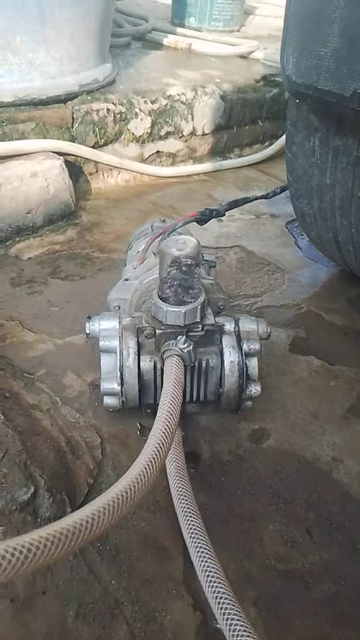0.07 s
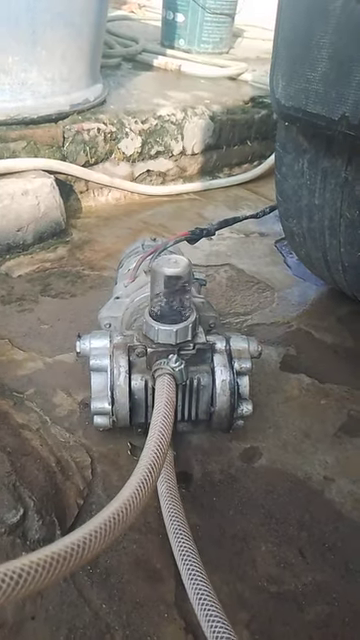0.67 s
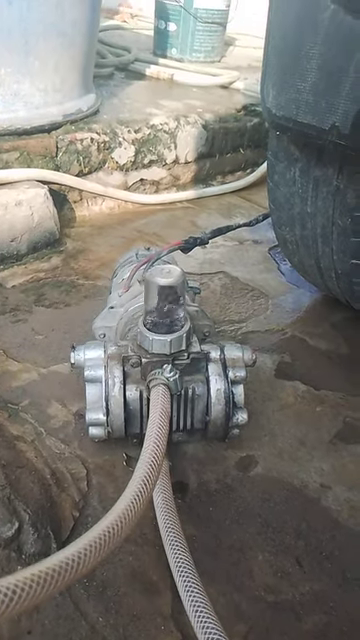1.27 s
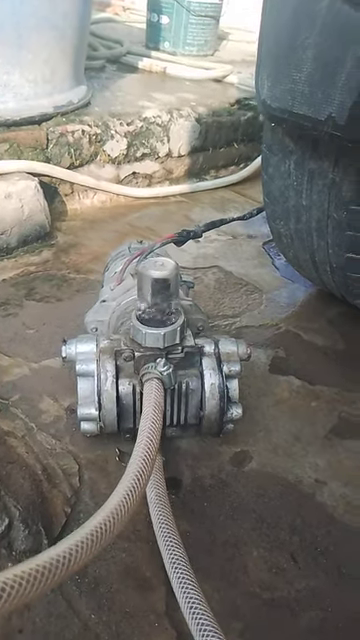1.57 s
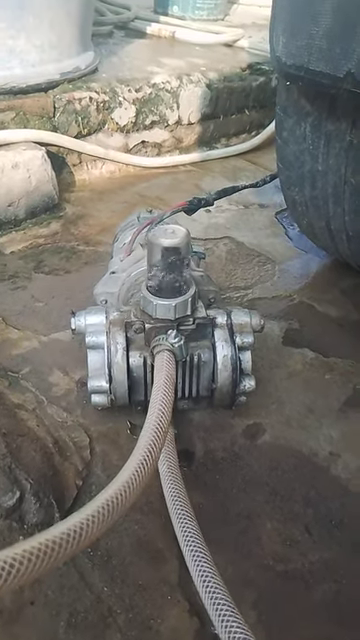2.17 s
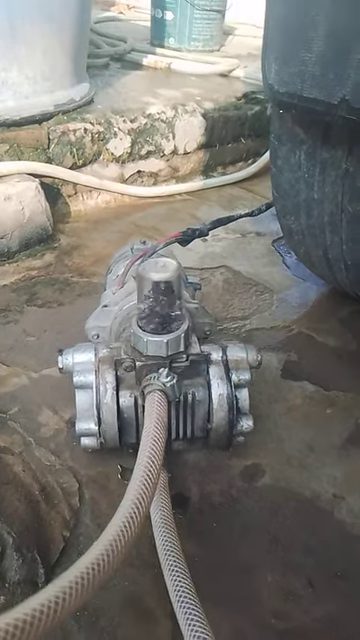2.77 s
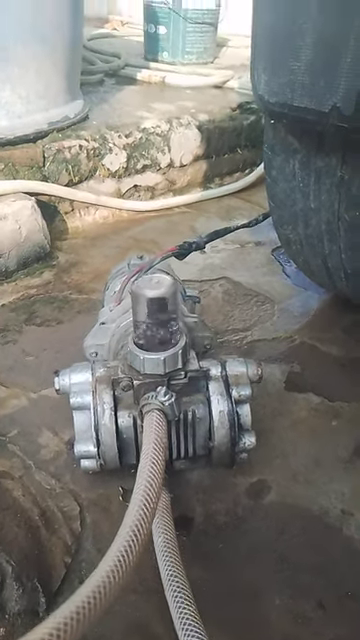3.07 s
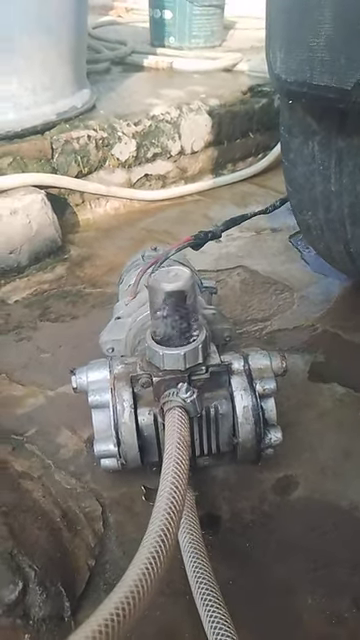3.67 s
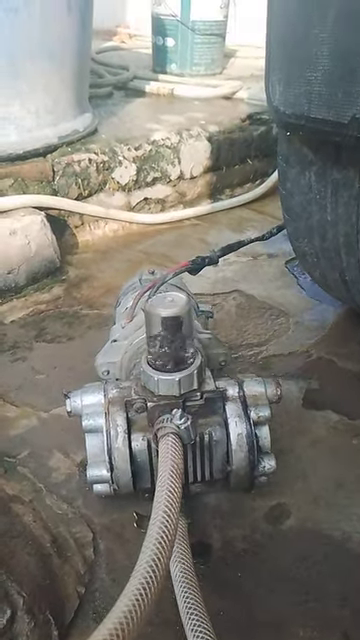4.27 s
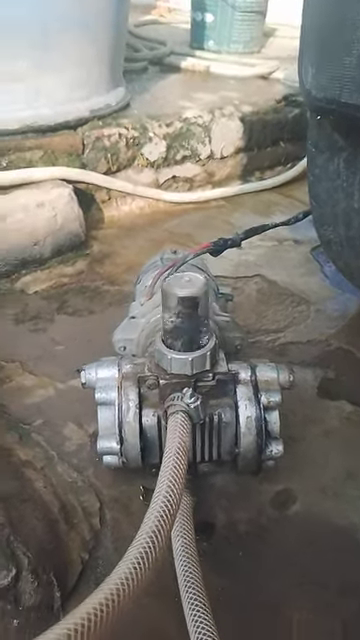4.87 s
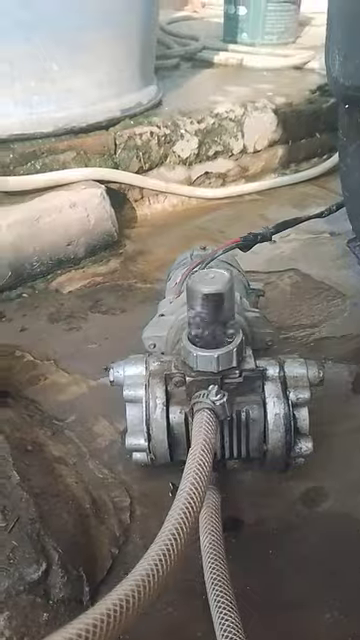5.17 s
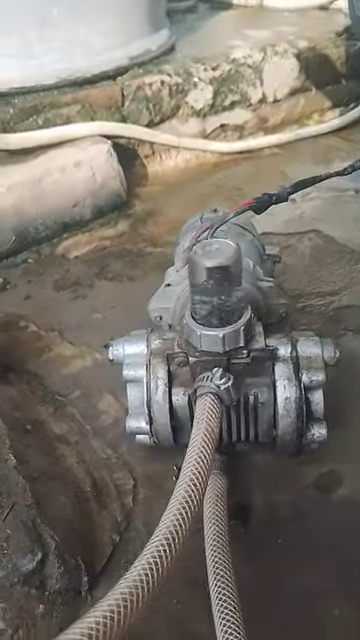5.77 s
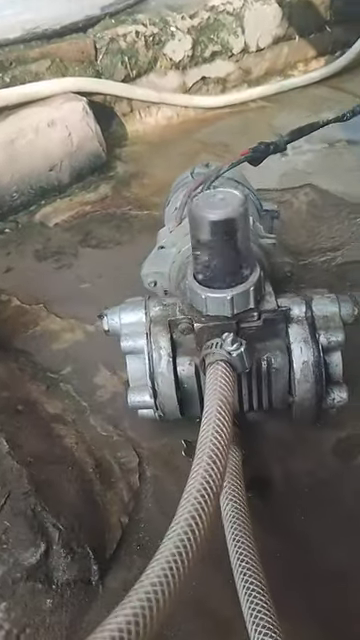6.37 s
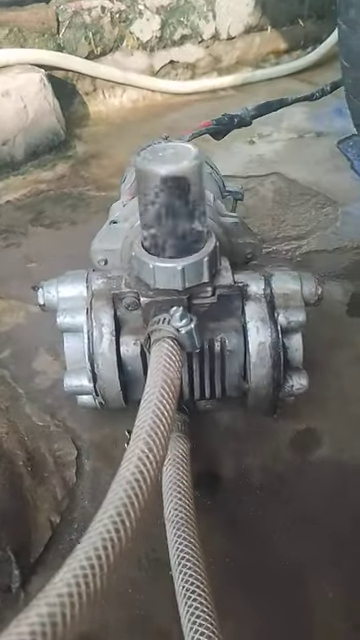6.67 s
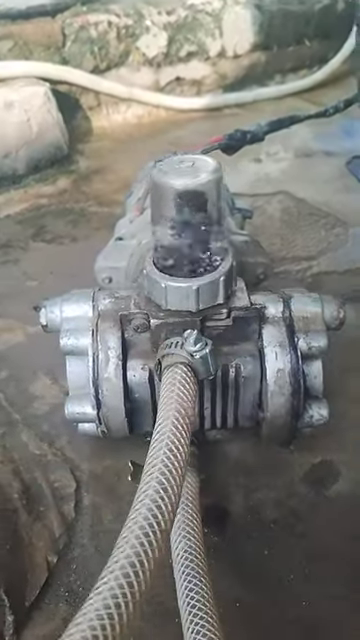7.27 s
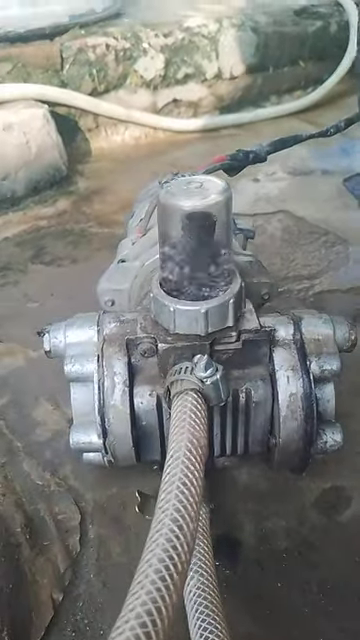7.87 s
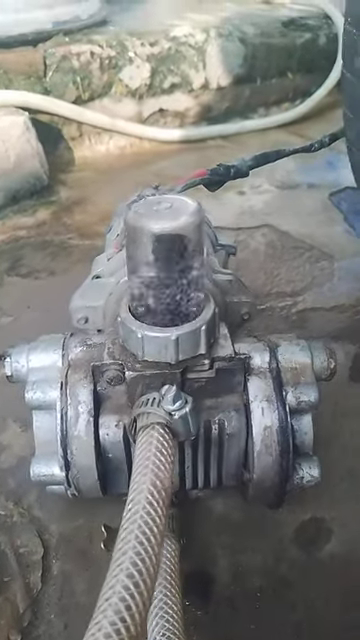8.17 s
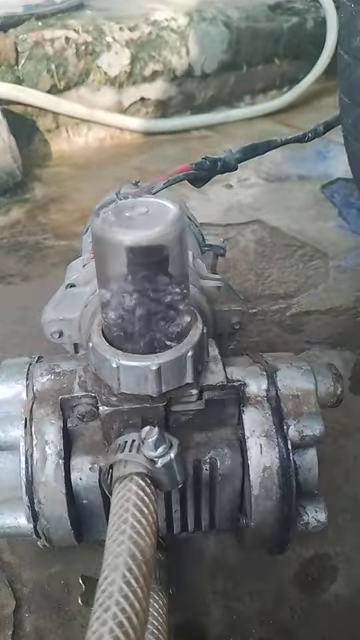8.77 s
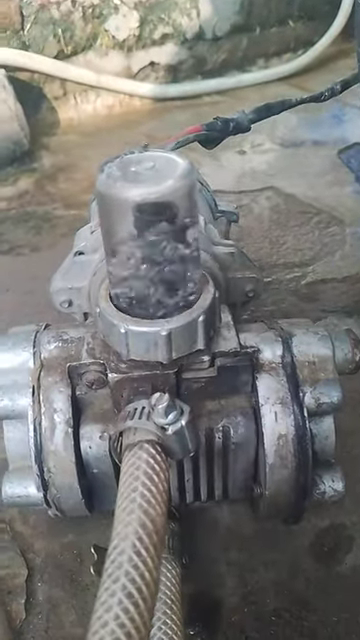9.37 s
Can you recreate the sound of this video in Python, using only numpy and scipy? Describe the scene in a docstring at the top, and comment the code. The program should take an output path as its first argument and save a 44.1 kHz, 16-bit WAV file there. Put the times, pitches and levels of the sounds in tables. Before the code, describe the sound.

After a moment of silence, a small electric piston pump cuts in, already running outdoors. It knocks rapidly and evenly over a low motor drone, spitting air and water through its valves while the metal casing rattles and a loose part chatters in short ringing bursts. The sound softens briefly, then swells as the microphone moves in, ending close with the chatter at its loudest.

```python
"""After a moment of silence, a small electric piston pump is heard running on wet concrete outdoors.
From the first turn, its crank thumps the hoses, knocks dully and spits air and water through the valves;
between spits the metal casing rattles and a loose part chatters in short ringing bursts.
The pump softens briefly near 2 s, then swells as the microphone moves in, facing the valve cap near 6 s.
By the end the pump head is close, and the part, worked looser, chatters at its loudest."""
import sys
import numpy as np
from scipy import signal
from scipy.fft import rfft, irfft
from scipy.io import wavfile

SR = 44100
rng = np.random.default_rng(int(sys.argv[2]) if len(sys.argv) > 2 else 0)


def int16_out(signal):
    """Quantize to a 16-bit WAV file."""
    q = np.round(np.clip(np.atleast_2d(signal).T, -1, 1) * 32767)
    wavfile.write(sys.argv[1], SR, q.astype(np.int16))


N = 419832
TIME = np.arange(N) / SR

# outdoor air bed: freq_hz, gain_db
AIR_COLOUR = [(20, -20), (45, -9), (110, 4), (170, -7.5), (400, 0), (2000, -16.5), (15000, -26.5)]
# how far the crank runs ahead of its steady pace: time_s, lead_turns
CRANK_LEAD = [(.9, -.07), (1.6, -.06), (2.05, -.125), (3.25, -.045), (3.6, -.06), (4.5, .03), (5.35, .01),
              (6.07, .095), (6.7, .04), (7.6, .06), (8.75, -.01), (9.5, -.14)]
# pressure pulse in the hoses: crank_multiple, level_db
THUMP_PARTIALS = [(3, -42), (4, 0.5), (5, -8.5), (6, -22), (7, -13), (8, -15)]
# motor drone: crank_multiple, level_db
DRONE_PARTIALS = [(4, -9.5), (6, -29), (10, -19), (13, -5.5), (16, -7), (18, -1), (23, -3)]
# knocks within one turn: place_turns, level_db, pitch_hz, ring_s
TURN_KNOCKS = [(.08, -4, 430, .022), (.19, 2.5, 285, .05), (.53, -2.5, 312, .045), (.74, -14.5, 236, 0.031),
               (0.909, -3.5, 370, 0.034)]
# envelope of the spit over one turn: place_turns, level_db
SPIT_ENVELOPE = [(0, 3.5), (.1, -1.5), (.18, -7.5), (.3, -20.5), (.45, -34), (.65, -48), (.77, -23),
                 (.8, -5), (.9, -1)]
# broad tone of the valves: freq_hz, gain_db
VALVE_TONE = [(200, -16), (420, 4), (800, -2), (1800, 1), (3000, 2.5), (3700, 0.5), (5200, 1), (6400, -2.5),
              (7400, -11.5), (10000, -11), (13000, -13.5), (14500, -9.5), (15600, -8)]
# valve resonances: pitch_hz, width_hz, boost_db
VALVE_PEAKS = [(1932, 120, 11), (2490, 160, 6), (3370, 86, 5), (3632, 200, 9.5), (3876, 110, 12),
               (4060, 110, 8), (4278, 77, 6), (4715, 260, 8), (5116, 48, 4), (5415, 104, 6), (5566, 64, 4),
               (6020, 363, 9.5), (6838, 389, 4.5), (7800, 480, 10), (8298, 125, 5.6), (9084, 411, 10),
               (9957, 219, 9), (10660, 268, 9.5), (15513, 382, 7)]
# air bubbles ringing in the valve cap: pitch_hz, width_hz, level_db
CAP_BUBBLES = [(3905, 18, -24), (4765, 28, -17), (6100, 140, -24.5)]
# treble colour beamed by the valve cap: freq_hz, gain_db
CAP_BEAM = [(3000, 0.5), (4000, 1), (5000, -3.5), (5700, 3.5), (6600, 2.5), (7800, 1.5), (9500, -1),
            (15000, -0.5)]
# how squarely the microphone faces the cap: time_s, facing_fraction
CAP_FACING = [(.9, 0.16), (2.5, 0.04), (4.3, 0.18), (5.2, 0.77), (6.2, 1), (6.8, 0.34), (8, 0.15),
              (9.5, 0.15)]
# envelope of the rattle over one turn: place_turns, level_db
RATTLE_ENVELOPE = [(.02, -9.5), (.12, -15.5), (.21, -15.5), (.28, -11), (.38, -11), (.55, -16), (.7, -13.5),
                   (.84, -11.5), (.94, -19.5)]
# broad tone of the metal casing: freq_hz, gain_db
CASING_TONE = [(120, -45), (170, -44), (215, 1.5), (320, 6), (520, -5), (750, 2), (1000, 1), (1400, 0.03),
               (2300, 4.5), (3100, -3.5), (4200, -7), (6200, -11.5), (7400, -22.5), (10000, -32.5),
               (13000, -40), (15600, -35)]
# casing resonances: pitch_hz, width_hz, boost_db
CASING_PEAKS = [(880, 36, 9.8), (965, 48, 4.2), (1141, 215, 12.5), (1572, 184, 18.3), (1936, 44, 11.8),
                (2070, 210, 5.6), (2500, 43, 2.3), (2710, 97, 7), (3500, 410, 5.6), (6300, 370, 3.4)]
# the crank throws the loose part at the casing: place_turns, length_turns, level_db
PART_THROWS = [(.03, 0.11, -2.5), (.32, 0.21, 0), (.52, 0.12, -1), (.73, .07, -22)]
# its hardest clangs, relative to an ordinary throw: start_s, length_s, level_db
PART_CLANGS = [(1.753, 0.015, 5.5), (2.57, 0.004, 6), (2.623, .008, 11), (2.886, 0.028, 6),
               (3.056, 0.0071, 10), (3.392, 0.0074, 6.5), (3.922, 0.023, 4), (4.251, 0.018, 4.5),
               (4.404, .013, 7), (4.47, .011, 7), (5.111, 0.018, 6), (5.163, 0.013, 7), (5.555, 0.0074, 8),
               (5.607, .013, 6), (6.031, .02, 4.5), (6.242, 0.025, 5.5), (6.282, 0.026, 2.5),
               (6.524, 0.015, 7.5), (7.389, 0.0055, 10), (8.157, 0.013, 6.5), (8.636, 0.019, 5.5),
               (8.686, .022, 4), (8.745, 0.0065, 5.5), (8.802, 0.0077, 5), (9.08, .012, 5.5),
               (9.125, .012, 5), (9.235, 0.0074, 6.5)]
# an ordinary throw grows louder as the part works loose: time_s, level_db
PART_LOOSENESS = [(.9, -24.5), (2.5, -22), (3.4, -20), (4.4, -19.5), (4.9, -21), (6.3, -19), (6.7, -21.5),
                  (8, -20), (8.25, -15.5), (9.5, -15.5)]
# how far off the pump sounds as the microphone moves in, with brief dips in level: time_s, distance_m
APPARENT_DISTANCE = [(.9, 0.72), (2.2, 0.96), (3.1, 0.57), (6.2, 0.6), (6.8, 0.33), (7.9, 0.41),
                     (8.5, 0.37), (9.5, 0.28)]
# extra radiation heard close up: freq_hz, gain_db
CLOSE_COLOUR = [(300, 0), (550, 3.5), (880, -2), (1050, 0), (1170, 0), (1350, 5.5), (1580, -3.5),
                (1750, 3.5), (1935, -11), (2020, -7), (2200, -2.5), (2550, 1), (3000, -1), (3700, 1),
                (5000, -1), (15000, 0.5)]


def amp(db):
    """Decibels to gain."""
    return 10 ** (np.asarray(db) / 20)


def unit_rms(x):
    """Scales to rms 1."""
    return x / np.sqrt(np.mean(x ** 2) + 1e-20)


def curve(points):
    """Automation line through (time_s, value) points."""
    return np.interp(TIME, *np.transpose(points))


def drift(hz):
    """Smooth random wander of rms 1, rolling off above hz."""
    f = np.fft.rfftfreq(N, 1 / SR)
    return unit_rms(irfft(rfft(rng.standard_normal(N)) * np.exp(-(f / hz) ** 2), N))


def body(x, colour, modes=(), size=4096):
    """Rings x through a minimum-phase EQ: a broad colour with resonances on it."""
    hz = abs(np.fft.fftfreq(size, 1 / SR))
    f, db = np.transpose(colour)
    db = np.interp(np.log(hz + 1), np.log(f), db)
    for centre, width, height in modes:
        db = db + height / (1 + (2 * (hz - centre) / width) ** 2)
    spectrum = np.exp(np.conj(signal.hilbert(np.log(amp(db)))))
    return signal.oaconvolve(x, np.fft.ifft(spectrum).real)[:N]


def resonate(x, hz, width_hz):
    """A resonance of gain 1 that follows the curve hz."""
    carrier = np.exp(2j * np.pi * np.cumsum(hz) / SR)
    pole = np.exp(-np.pi * width_hz / SR)
    return 2 * (carrier * signal.lfilter([1 - pole], [1, -pole], x / carrier)).real


def each_turn(points, turns):
    """Gain envelope that loops with the crank."""
    place, db = np.transpose(points)
    return amp(np.interp(turns, place, db, period=1))


def grains(per_s, spread_db):
    """Random tiny impacts of uneven size."""
    size = amp(spread_db * np.clip(rng.standard_normal(N), -2, 2)) * rng.choice([-1, 1], N)
    return unit_rms(size * (rng.random(N) < per_s / SR))


def outdoor_air():
    """A steady bed of dark noise."""
    return unit_rms(body(rng.standard_normal(N), AIR_COLOUR))


def yard_reflections(x, wet_db=-15, t60=0.046):
    """Adds faint, short reflections from the ground, the kerb and the tanks."""
    t = np.arange(SR // 8) / SR
    taps = rng.choice([-1, 1], len(t)) * (rng.random(len(t)) < 2000 / SR)
    taps = taps * (t > .002) * amp(-60 * t / t60)
    return x + amp(wet_db) * signal.oaconvolve(x, taps / np.linalg.norm(taps))[:N]


def hose_and_motor_hum(turns, thump_turns=0.21):
    """One pressure pulse a turn thumps the hoses over the drone of the motor."""
    thump = sum(amp(db) * np.cos(2 * np.pi * k * (turns - thump_turns)) for k, db in THUMP_PARTIALS)
    drone = sum(amp(db + 2 * drift(12)) * np.sin(2 * np.pi * k * turns) for k, db in DRONE_PARTIALS)
    return np.sqrt(2) * (thump + drone)


def piston_knocks(turns, jitter_s=0.00052, spread_db=1.5):
    """Pistons and valves knock dully at set crank angles, never quite alike."""
    t, out = np.arange(SR // 10) / SR, np.zeros(N)
    count = np.arange(int(turns[-1]))
    for place, db, hz, t60 in TURN_KNOCKS:
        late, size = rng.standard_normal((len(count), 2)).T
        start_s = np.interp(count + place, turns, TIME) + jitter_s * late
        samples = np.clip(start_s * SR, 0, N).astype(int)
        blows = np.bincount(samples, amp(db + spread_db * size), N + 1)[:N]
        ring = np.sin(2 * np.pi * hz * t) * amp(-60 * t / t60)
        out += signal.oaconvolve(blows, ring)[:N]
    dull_tone = [(100, -28.5), (170, -12), (235, -5), (450, 4.5), (700, -6.5), (2000, -19)]
    return unit_rms(body(out, dull_tone))


def head_ring(turns, pitch_hz=3630, width_hz=38):
    """One thin mode of the pump head rings in the rhythm of the rattle."""
    drive = rng.standard_normal(N) * each_turn(RATTLE_ENVELOPE, turns)
    return unit_rms(resonate(drive, np.full(N, pitch_hz), width_hz))


def valve_spit(turns, stroke_db=1.7, slip_turns=0.0039, size_scatter=0.032, bubble_spread_db=4):
    """Air and water squeeze through the valves as a dense fizz; bubbles of changing size ring in it."""
    opening = each_turn(SPIT_ENVELOPE, turns + slip_turns * drift(25))
    jet = grains(per_s=10000, spread_db=2.5) * opening * amp(stroke_db * drift(4.8))
    fizz = unit_rms(body(jet, VALVE_TONE, VALVE_PEAKS))
    stroke = np.round(turns + 1).astype(int)
    for hz, width, db in CAP_BUBBLES:
        detune = size_scatter * rng.standard_normal(int(turns[-1]) + 3)[stroke]  # new on every stroke
        ring = resonate(jet * amp(bubble_spread_db * drift(9.2)), hz * (1 + detune), width)
        fizz = fizz + amp(db) * unit_rms(ring)
    fizz = unit_rms(fizz)
    facing = curve(CAP_FACING)
    return (1 - facing) * fizz + facing * body(fizz, CAP_BEAM)


def casing_rattle(turns):
    """Small impacts and churning water ring the metal casing."""
    impacts = grains(per_s=3000, spread_db=2.5)
    clumps = amp(1.5 * drift(90))
    churn = rng.standard_normal(N)
    drive = (impacts + churn) * clumps * each_turn(RATTLE_ENVELOPE, turns)
    return unit_rms(body(drive, CASING_TONE, CASING_PEAKS))


def loose_part_force(turns, idle_db=-8, spread_db=3.4, jitter_turns=.025, stretch=0.36, play_db=6):
    """The loose part shakes faintly with the rattle and hits hard when the crank throws it."""
    force = amp(idle_db + 3.7 * drift(32)) * unit_rms(each_turn(RATTLE_ENVELOPE, turns))
    for turn in range(int(turns[-1]) + 1):
        for place, length, db in PART_THROWS:
            late, longer, size = rng.standard_normal(3)
            begin = turn + place + jitter_turns * late
            end = begin + length * np.exp(stretch * longer)
            throw = slice(*np.searchsorted(turns, [begin, end]))
            # its play limits the swing
            force[throw] = amp(play_db) * np.tanh(amp(db + spread_db * size - play_db))
    for start_s, length_s, db in PART_CLANGS:
        clang = np.arange(round(start_s * SR), round((start_s + length_s) * SR))
        force[clang] = amp(db) * np.linspace(1.1, .8, len(clang))  # hardest at first
    return force


def loose_part_chatter(turns, main_hz=1585, lower_hz=1168, ring_s=.0022, roughness=0.048):
    """The loose part buzzes at two wavering casing modes; the lower grows little in hard clangs."""
    pole = np.exp(-1 / (ring_s * SR))
    swing = signal.lfilter([1 - pole], [1, -pole], loose_part_force(turns))
    swing *= 1 + roughness * drift(270)
    main_pitch = main_hz + 12 * drift(19.9) + 14 * drift(207.4)
    lower_pitch = lower_hz + 24 * drift(94)
    lower_swing = amp(-8 + 1.4 * drift(27)) * np.tanh(swing)
    main = swing * np.sin(2 * np.pi * np.cumsum(main_pitch) / SR)
    lower = lower_swing * np.sin(2 * np.pi * np.cumsum(lower_pitch) / SR)
    return amp(curve(PART_LOOSENESS)) * (main + lower)


def scene(crank_hz=18.45, colour_from_m=0.65, colour_full_m=0.42):
    """The crank times the pump; knocks, rattle and spit swell and change colour as the microphone nears."""
    turns = crank_hz * TIME + curve(CRANK_LEAD)
    metres = curve(APPARENT_DISTANCE)
    halvings = np.log2(APPARENT_DISTANCE[0][1] / metres)
    # faders: dB at the opening distance, plus dB for each halving of it
    pump = (amp(-41.5 + 1.5 * halvings) * piston_knocks(turns)
            + amp(-26.5 + 2.5 * halvings) * casing_rattle(turns)
            + amp(-31 + 2.43 * halvings) * valve_spit(turns))
    near = np.clip((colour_from_m - metres) / (colour_from_m - colour_full_m), 0, 1)
    pump = (1 - near) * pump + near * body(pump, CLOSE_COLOUR)
    pump += amp(-42.5) * np.maximum(halvings, 0) * head_ring(turns)  # only heard close up
    air = amp(-47) * outdoor_air()
    mix = yard_reflections(pump) + loose_part_chatter(turns) + amp(-46.5) * hose_and_motor_hum(turns)
    return (mix + air)[None]


def record(dry, start_s=.895, fade_s=0.0011, cutoff_hz=15800):
    """Cuts in from silence and trims the very top of the treble."""
    opened = dry * np.clip((TIME - start_s) / fade_s, 0, 1)
    low_pass = signal.firwin(1023, cutoff_hz, window=("kaiser", 9), fs=SR)
    return signal.oaconvolve(opened, low_pass[None], "same")


dry = scene()
out = record(dry)
int16_out(out)
```